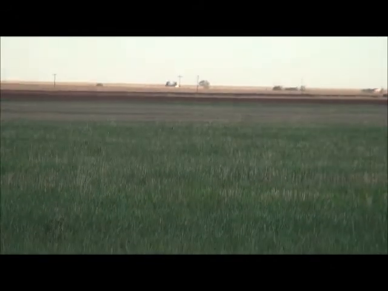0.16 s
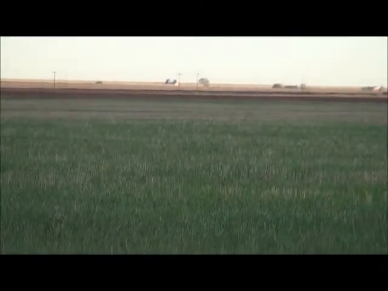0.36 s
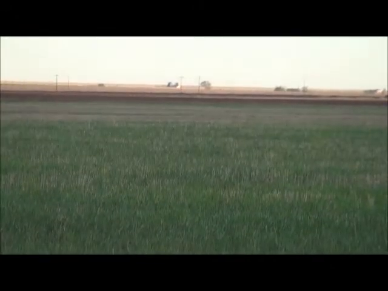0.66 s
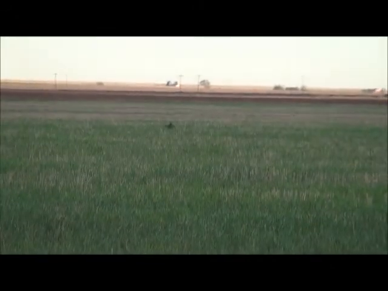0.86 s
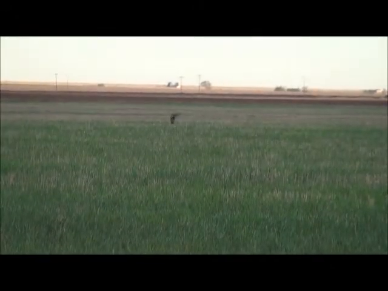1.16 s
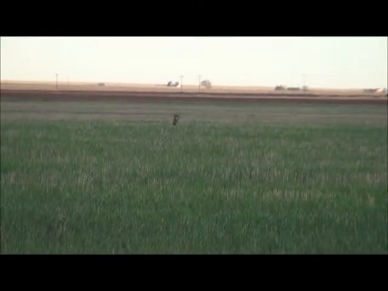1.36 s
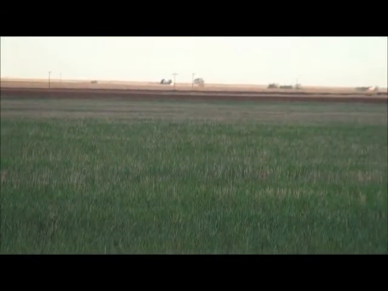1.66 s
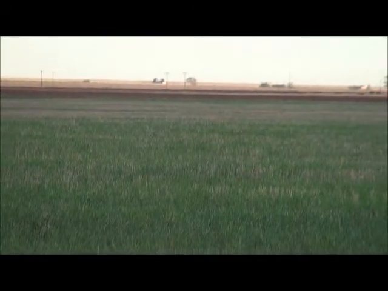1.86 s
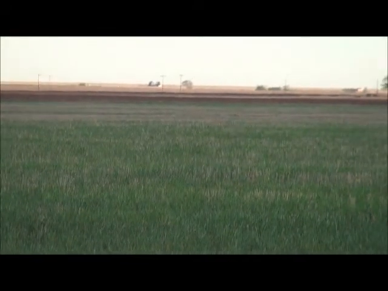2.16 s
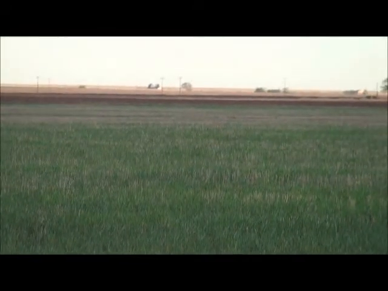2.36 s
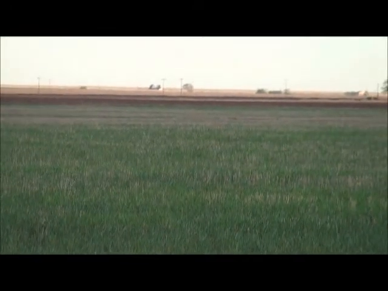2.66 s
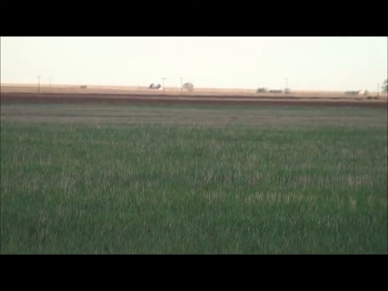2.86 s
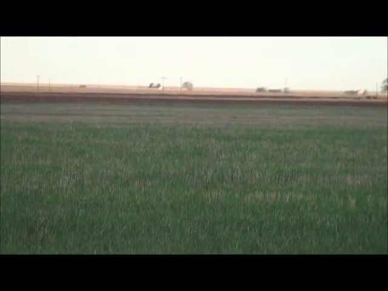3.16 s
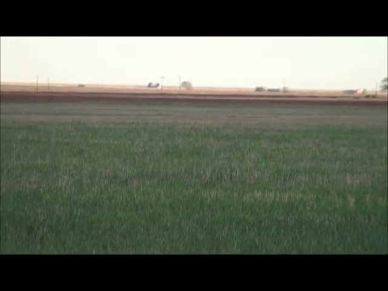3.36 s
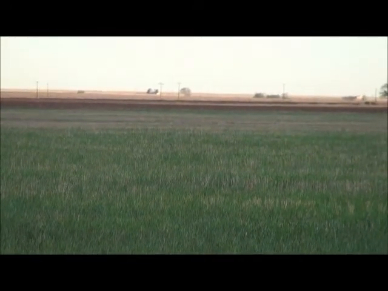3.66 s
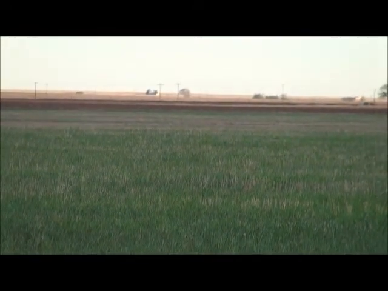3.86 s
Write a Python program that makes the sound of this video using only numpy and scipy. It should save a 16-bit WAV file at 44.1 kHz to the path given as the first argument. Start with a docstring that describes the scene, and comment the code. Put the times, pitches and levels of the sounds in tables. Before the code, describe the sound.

A prairie chicken cackles five short arched notes in an open grassy field, after a few tiny songbird chirps; distant birds cluck in answer while wind rumbles and thumps on a hissing stereo camera microphone.

```python
"""A prairie chicken cackles across an open field: five arched notes, the first two nearly joined.
Each is a harmonic series on an unsteady pitch, filtered by a throat; others answer faintly the same way.
A small songbird chirps in short sine glides. Wind noise with single thumps buffets the two microphone
ports of a camera, which adds its own hiss and a thin whine of a few unsteady sines."""
import sys
import numpy as np
from scipy import signal
from scipy.fft import rfft, irfft, next_fast_len
from scipy.io import wavfile
from scipy.ndimage import map_coordinates

SR = 44100
rng = np.random.default_rng(int(sys.argv[2]) if len(sys.argv) > 2 else 0)


def output_pcm(signal):
    """Save a mono or channel-first signal as 16-bit PCM at the path in sys.argv[1].

    Samples are clipped to [-1, 1] before scaling.
    """
    pcm = np.clip(np.atleast_2d(signal).T, -1, 1) * 32767
    wavfile.write(sys.argv[1], SR, np.round(pcm).astype(np.int16))


N = 176400  # samples, four seconds


def amp(db):
    """Decibel law: a level in dB becomes an amplitude ratio."""
    return 10 ** (np.asarray(db) / 20)


def unit(x):
    """Normalization: scale to an rms of 1."""
    return x / np.sqrt(np.mean(x ** 2) + 1e-20)


def along(points, hz):
    """Logarithmic pitch scale: (Hz, value) points read on a log axis."""
    f, v = np.transpose(points)
    return np.interp(np.log(hz + 1), np.log(f + 1), v)


def curves(rows, t):
    """Linear interpolation: each column after the time, read at times t."""
    s, *cols = np.transpose(rows)
    return [np.interp(t, s, c) for c in cols]


def wobble(rate, size=N):
    """Band-limited modulation: a smooth random curve with rate knots a second."""
    knots = rng.standard_normal(4000)
    return map_coordinates(knots, [np.arange(size) * rate / SR], mode="wrap")


def filtered(x, response):
    """Linear filtering: multiply the spectrum of x by a response of frequency."""
    m = next_fast_len(N + 8192)
    spectrum = rfft(x, m) * response(np.fft.rfftfreq(m, 1 / SR))
    return irfft(spectrum, m)[..., :N]


def pan(db):
    """Level difference between channels: gains that favour left over right by db."""
    return amp([[db / 2], [-db / 2]])


def rush(spectrum, alike):
    """Partial coherence: stereo noise of rms 1 from a mid and a side part, mixed by likeness."""
    def mid_side_gains(hz):
        turn = np.arccos(np.clip(along(alike, hz), -1, 1)) / 2
        return amp(along(spectrum, hz)) * [np.cos(turn), np.sin(turn)]
    mid, side = filtered(rng.standard_normal((2, N)), mid_side_gains)
    return unit(np.array([mid + side, mid - side]))


def span(start, end):
    """Sampling: the sample indices between two times in seconds."""
    return np.arange(int(start * SR), min(int(end * SR), N))


# Hiss spectrum. Each row: frequency in Hz, relative level per Hz in dB.
HISS_SPECTRUM = [(900, 0.5), (1400, -3), (2500, -6), (3300, -8), (6000, -12), (11000, -16), (11900, -12),
                 (14000, -14.5), (15600, -14.5)]
# Likeness of the hiss in both channels. Each row: frequency in Hz, left-right correlation.
HISS_ALIKE = [(1000, 0.092), (3000, 0.029), (8000, 0.37), (11500, 1)]
# Hiss level. Each row: time in seconds, rms level in dB.
HISS_LEVEL = [(1.4, -54), (1.6, -55.5)]
# Whine tones. Each row: frequency in Hz, rms level in dB.
WHINE_TONES = [(840, -70), (1190, -70.5), (2523, -72.5), (2593, -77), (4376, -80.5)]


def background(t):
    """Electronic noise and phase modulation: nearly even hiss and the camera's unsteady whine."""
    hiss_db, = curves(HISS_LEVEL, t)
    whine = np.zeros(N)
    for hz, db in WHINE_TONES:
        drift = 1.5 * wobble(14)  # radians
        whine += amp(db) * np.sqrt(2) * np.sin(2 * np.pi * hz * t + drift)
    return amp(hiss_db) * rush(HISS_SPECTRUM, HISS_ALIKE) + whine


# Wind strength at the microphone. Each row: time in seconds, reference level in dB.
WIND_STRENGTH = [(.08, -53), (.26, -41), (.46, -43.5), (.56, -34.5), (.72, -34.5), (1.02, -45), (1.2, -36),
                 (1.32, -37.5), (1.405, -32.5), (1.49, -34.5), (1.63, -24.5), (1.7, -38.5), (1.78, -26),
                 (1.83, -31.5), (2.23, -30), (2.46, -32), (2.54, -36.5), (2.76, -34.5), (2.87, -27),
                 (3.1, -28), (3.3, -34), (3.42, -29.5), (3.57, -29.5), (3.69, -34.5)]
# Share of fine eddies, heard as brightness. Each row: time in seconds, gain in dB.
FINE_EDDIES = [(.7, 1), (1.3, -7.5), (1.6, 1), (2.15, -5), (2.38, 1), (2.95, 1.5), (3.44, 0), (3.75, 1)]
# Slowest pressure swings. Each row: frequency in Hz, relative level per Hz in dB.
DEEP_SPECTRUM = [(10, 3), (25, 6.5), (50, 11), (200, -50)]
# Share of the slowest swings. Each row: time in seconds, gain against the wind strength in dB.
DEEP_GAIN = [(2.45, -2.5), (2.75, -8.5)]
# Large eddies. Each row: frequency in Hz, relative level per Hz in dB.
RUMBLE_SPECTRUM = [(25, -29), (55, -1.5), (80, -2), (115, -3), (200, -12), (330, -29), (1500, -86.5)]
# Likeness of large eddies at the two ports. Each row: frequency in Hz, left-right correlation.
RUMBLE_LIKENESS = [(40, 1), (125, 0.71), (250, 0.34)]
# Small eddies, also in the thumps. Each row: frequency in Hz, relative level per Hz in dB.
FLUTTER_SPECTRUM = [(40, -28), (130, 1.5), (220, 0.5), (350, -6.5), (850, -29), (2600, -55), (5000, -78)]
# Likeness of small eddies, also in the thumps. Each row: frequency in Hz, left-right correlation.
FLUTTER_LIKENESS = [(125, 0.93), (500, -0.13)]
# Pops, and the crackle of the thumps. Each row: frequency in Hz, relative level in dB.
CRACKLE_SPECTRUM = [(250, -5.5), (450, 8.5), (1400, -10.5), (2300, -19.5), (3500, -47)]
RUMBLE_DB, FLUTTER_DB, POPS_DB = -0.5, -6.5, -24  # gains against the mean wind strength
FLUTTER_GROWS, POPS_GROW = 1.44, 1.34  # dB per dB of gust
CHOP_LIMIT_DB, CHOP_PER_S = 4, 38  # quick level swings of the flutter
POPS_PER_S = 150  # tiny eddies bursting on each port


def wind(t):
    """Turbulence: large eddies rumble in both ports; small ones flutter and pop, growing faster in gusts."""
    strength_db, = curves(WIND_STRENGTH, t)
    eddies_db, = curves(FINE_EDDIES, t)
    deep_db, = curves(DEEP_GAIN, t)
    mean_db = strength_db.mean()
    gust_db = strength_db - mean_db
    chop_db = CHOP_LIMIT_DB * np.tanh(wobble(CHOP_PER_S))

    rumble_db = RUMBLE_DB + gust_db + 1.42 * chop_db
    rumble = amp(rumble_db) * rush(RUMBLE_SPECTRUM, RUMBLE_LIKENESS) * pan(1.3)
    deep = amp(gust_db + deep_db) * rush(DEEP_SPECTRUM, RUMBLE_LIKENESS)

    lumps_db = 2.1 * np.array([wobble(110), wobble(110)])  # separate in each port
    flutter_db = FLUTTER_DB + FLUTTER_GROWS * gust_db + eddies_db + chop_db + lumps_db
    flutter = amp(flutter_db) * rush(FLUTTER_SPECTRUM, FLUTTER_LIKENESS)

    ticks = (rng.random((2, N)) < POPS_PER_S / SR) * rng.standard_normal((2, N))
    # the factor 1j turns the phase a quarter cycle
    clicks = unit(filtered(ticks, lambda hz: 1j * amp(along(CRACKLE_SPECTRUM, hz))))
    pops = amp(POPS_DB + POPS_GROW * gust_db + eddies_db) * clicks
    return amp(mean_db) * (deep + rumble + (flutter + pops) * pan(-3))


# Single eddies that thump the ports.
# Each row: centre in seconds, peak pressure in dB before panning, crackle level in dB.
THUMP_EDDIES = [(1.388, -15, -58), (1.465, -21, -47), (1.518, -18.5, -43), (1.537, -12.5, -68),
                (1.612, -23, -55), (2.019, -13, -36), (2.202, -14.5, -32.5), (2.361, -21, -29.5),
                (2.383, -22.5, -37), (2.46, -19, -37), (2.478, -30, -42), (2.882, -24.5, -32),
                (2.937, -21.5, -37.5), (2.969, -18, -26), (3.028, -16.5, -27), (3.037, -15, -34),
                (3.428, -29.5, -35.5), (3.491, -20.5, -34), (3.857, -23, -39)]
THUMP_S, THUMP_WIDENS = 0.0056, 0.51  # width at 0 dB; dB of width per dB of pressure
CRACKLE_S = 0.002  # Gaussian width
WAKE_DB, WAKE_S = -14, 0.012  # level against the thump, Gaussian width


def thumps(t):
    """Pressure of a passing eddy: a push, then a pull, with a brief crackle and a churning wake."""
    push, burst, wake = np.zeros((3, N))
    for s, db, crackle_db in THUMP_EDDIES:
        u = (t - s) / (THUMP_S * amp(THUMP_WIDENS * db))  # stronger eddies are wider
        push -= amp(db) * u * np.exp((1 - u * u) / 2)
        burst += amp(crackle_db) * np.exp(-((t - s) / CRACKLE_S) ** 2 / 2)
        # the wake is centred half its width after the thump
        wake += amp(db + WAKE_DB) * np.exp(-((t - s) / WAKE_S - .5) ** 2 / 2)
    crackle = burst * rush(CRACKLE_SPECTRUM, FLUTTER_LIKENESS)
    churn = wake * rush(FLUTTER_SPECTRUM, FLUTTER_LIKENESS)
    return push * pan(3.1) + crackle + churn


ECHO_DB, ECHO_T60_S = -14, 0.12  # scattered level against direct, time to decay by 60 dB


def field_echo(x):
    """Scattering: the open ground returns a short decaying tail, different in each channel."""
    t = np.arange(SR // 2) / SR
    tail = rng.standard_normal((2, len(t))) * amp(-60 * t / ECHO_T60_S)
    tail = tail / np.linalg.norm(tail[0])
    return x + amp(ECHO_DB) * signal.fftconvolve(np.atleast_2d(x), tail, axes=1)[:, :N]


UNSTEADY_PER_S = 260  # knots a second in the birds' pitch and level wobbles

# Songbird chirps.
# Each row: start in seconds, length in seconds, start pitch in Hz, end pitch in Hz, peak level in dB.
CHIRP_NOTES = [(.562, .024, 5470, 5200, -60), (0.79, 0.014, 5220, 5020, -61),
               (0.86, 0.049, 6340, 5400, -60), (0.894, 0.014, 5700, 6250, -57),
               (0.957, 0.012, 5030, 4330, -58), (.967, 0.024, 4050, 3600, -58),
               (1.037, 0.05, 5380, 5930, -59)]


def songbird():
    """Frequency modulation: a tinkling run of quick, gliding, quavering whistles."""
    out = np.zeros(N)
    for s, length, hz0, hz1, db in CHIRP_NOTES:
        i = span(s, s + length)
        hz = np.linspace(hz0, hz1, len(i)) * (1 + 0.01 * wobble(UNSTEADY_PER_S, len(i)))
        whistle = np.sin(2 * np.pi * np.cumsum(hz) / SR)
        out[i] += amp(db) * signal.windows.tukey(len(i), .5) * whistle
    return out


JITTER, SHIMMER_DB = 0.012, 1.58  # pitch fraction and level wobble, at a roughness of 1


def voice(hz, throat, rough):
    """Source and filter: harmonics of an unsteady pitch, weighted by the resonance of the throat."""
    size = len(hz)
    unsteady_hz = hz * (1 + JITTER * rough * wobble(UNSTEADY_PER_S, size))
    phase = 2 * np.pi * np.cumsum(unsteady_hz) / SR
    tone = sum(amp(along(throat, k * hz)) * np.sin(k * phase) for k in range(1, 7))
    shimmer_db = SHIMMER_DB * np.minimum(rough, 3) * wobble(UNSTEADY_PER_S, size)
    return np.sqrt(2) * tone * amp(shimmer_db)


# Distant birds answering. Each row: start in seconds, length in seconds, start pitch in Hz,
# end pitch in Hz, level in dB before the throat.
ANSWER_CLUCKS = [(1.992, 0.039, 952, 693, -56), (2.013, .065, 780, 658, -60),
                 (2.086, 0.053, 777, 683, -56.5), (2.645, 0.064, 771, 721, -61),
                 (2.78, 0.062, 740, 768, -59), (3.29, .034, 1100, 963, -52),
                 (3.723, 0.021, 1100, 1000, -52), (3.789, 0.043, 886, 803, -60),
                 (3.884, 0.077, 816, 750, -60)]
# Throat of the distant birds. Each row: frequency in Hz, gain in dB.
DISTANT_THROAT = [(700, -13), (1100, -18), (1450, -2.5), (1850, -5), (2200, -10.5), (2400, -6), (2700, -26)]
FLOCK_START_S, FLOCK_PER_S, FLOCK_LENGTH_S = 1.7, 16, 0.054
FLOCK_DB, FLOCK_HZ, FLOCK_SPREAD = -67, 728.5, 0.0713  # before the throat; spread in log pitch


def answers():
    """Source and filter, at a distance: sliding clucks over the faint random chatter of the flock."""
    flock = []
    for s in np.arange(FLOCK_START_S, N / SR - 2 * FLOCK_LENGTH_S, 1 / FLOCK_PER_S):
        start = s + FLOCK_LENGTH_S * rng.random()
        hz0, hz1 = FLOCK_HZ * np.exp(FLOCK_SPREAD * rng.standard_normal(2))
        flock.append((start, FLOCK_LENGTH_S, hz0, hz1, FLOCK_DB))
    out = np.zeros(N)
    for s, length, hz0, hz1, db in ANSWER_CLUCKS + flock:
        i = span(s, s + length)
        cluck = voice(np.linspace(hz0, hz1, len(i)), DISTANT_THROAT, rough=2.5)
        out[i] += amp(db) * signal.windows.tukey(len(i), .6) * cluck
    return out


# The cackle, one list per note.
# Each row: time in seconds, pitch in Hz, level in dB before the throat and CACKLE_DB.
CACKLE_NOTES = [
    [(1.13, 682, -71), (1.235, 710, -52), (1.252, 713, -57), (1.262, 823, -44.5), (1.294, 763, -47.5),
     (1.302, 818, -47), (1.322, 812, -39.5), (1.333, 738, -49), (1.339, 814, -42), (1.351, 792, -37),
     (1.36, 706, -59)],
    [(1.362, 780, -47), (1.377, 805, -40), (1.387, 893, -38.5), (1.403, 715, -56)],
    [(1.505, 558, -50), (1.513, 716, -41.5), (1.523, 805, -46), (1.543, 885, -45.5), (1.569, 818, -42),
     (1.579, 787, -39.5), (1.594, 818, -38.5), (1.61, 786, -40), (1.62, 587, -55)],
    [(1.697, 412, -47), (1.709, 587, -48), (1.716, 748, -31.5), (1.731, 842, -40), (1.75, 786, -32.5),
     (1.773, 813, -30), (1.78, 756, -47), (1.789, 457, -43)],
    [(1.862, 396, -51), (1.874, 612, -50), (1.88, 657, -36.5), (1.892, 780, -31.5), (1.917, 754, -35.5),
     (1.924, 712, -48), (1.933, 620, -63)],
]
# Throat of the near bird. Each row: frequency in Hz, gain in dB.
NEAR_THROAT = [(750, -48), (1000, -8), (1250, 2.5), (1550, -3), (1780, -3), (1980, -23), (2400, -26),
               (4500, -53)]
CACKLE_DB, CACKLE_PAN_DB, EDGE_S = -1.5, -0.5, 0.0021
RASP_DB = -24  # throat noise against the note level
HUM_DB = -62  # the fundamental, which stands out only while a note is soft


def cackle():
    """Source and filter, near: arched notes over a soft fundamental, cleaner when loud, with a slight rasp."""
    out = np.zeros(N)
    breath = filtered(rng.standard_normal(N), lambda hz: amp(along(NEAR_THROAT, hz)))
    rasp = amp(RASP_DB) * unit(breath)
    for note in CACKLE_NOTES:
        i = span(note[0][0], note[-1][0])
        hz, db = curves(note, i / SR)
        edges = np.clip(np.minimum(i - i[0], i[-1] - i) / SR / EDGE_S, 0, 1)
        rough = amp(-.9 * (np.maximum(db, -51) + 42.5))  # 1 at a note level of -42.5 dB
        hum = amp(HUM_DB) * np.sqrt(2) * np.sin(2 * np.pi * np.cumsum(hz) / SR)
        call = amp(db + CACKLE_DB) * (voice(hz, NEAR_THROAT, rough) + rasp[i])
        out[i] += edges * (hum + call)
    return out * pan(CACKLE_PAN_DB)


def scene():
    """Superposition: birds in the field, wind on the microphone and the camera's own noise."""
    t = np.arange(N) / SR
    birds = field_echo(answers() + songbird()) + field_echo(cackle())
    return background(t) + wind(t) + thumps(t) + birds


def record(dry):
    """Band limiting: the camera keeps nothing from 15700 Hz up."""
    return filtered(dry, lambda hz: hz < 15700)


dry = scene()
out = record(dry)
output_pcm(out)
```